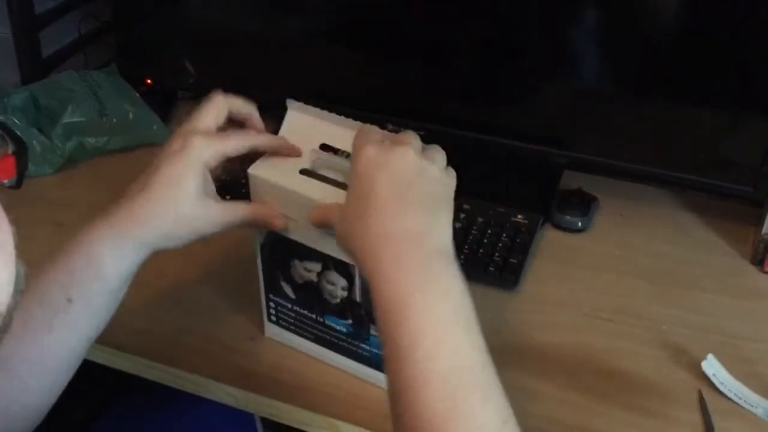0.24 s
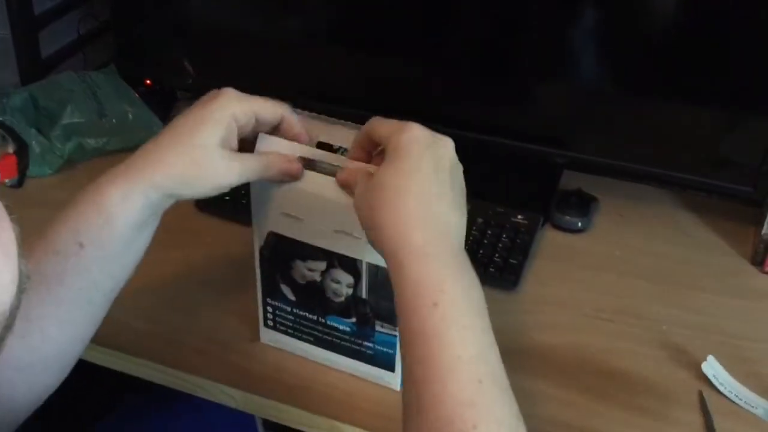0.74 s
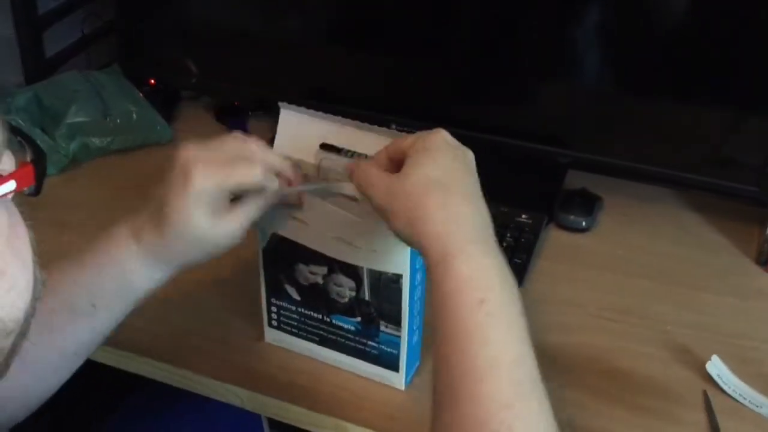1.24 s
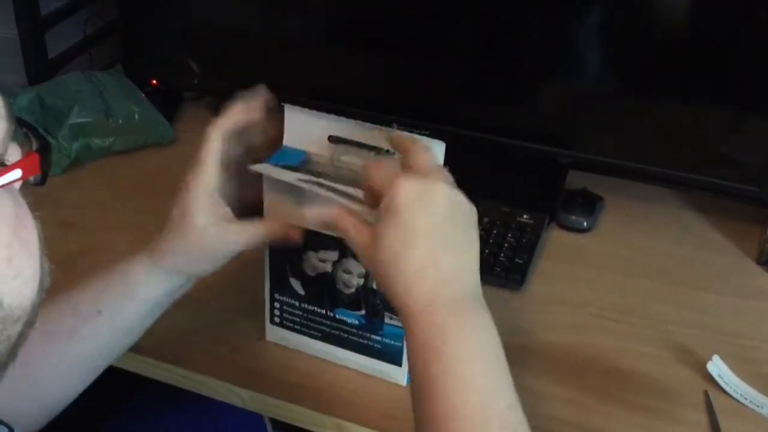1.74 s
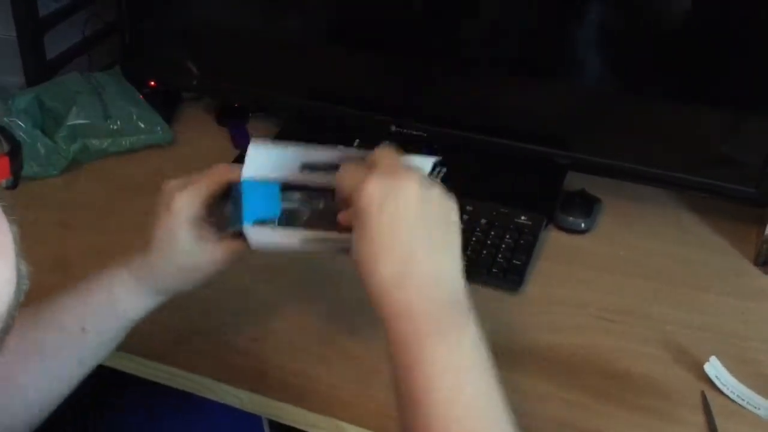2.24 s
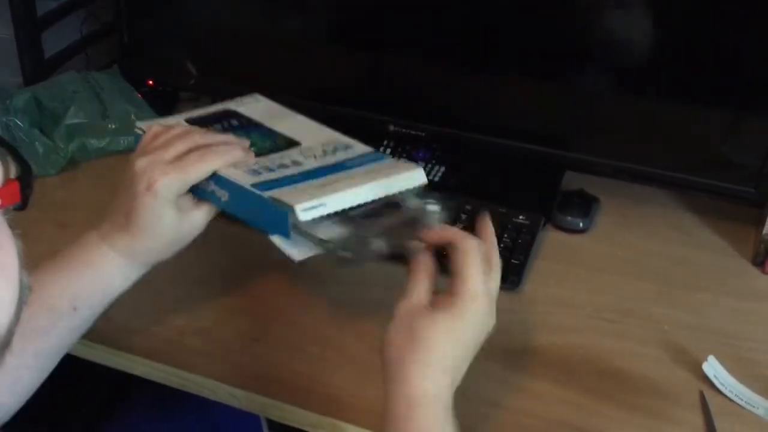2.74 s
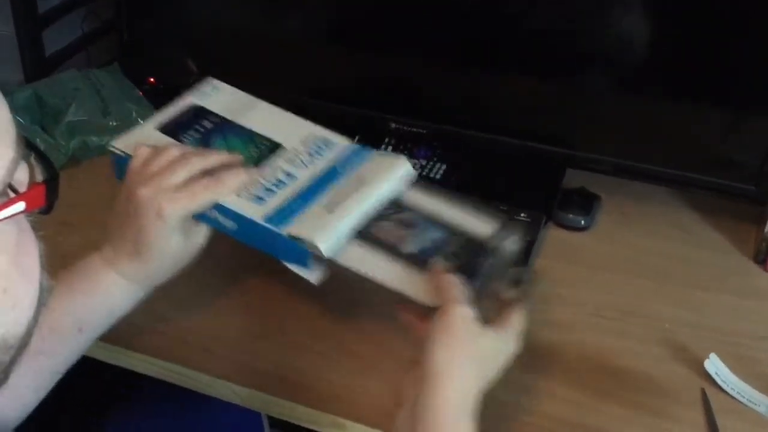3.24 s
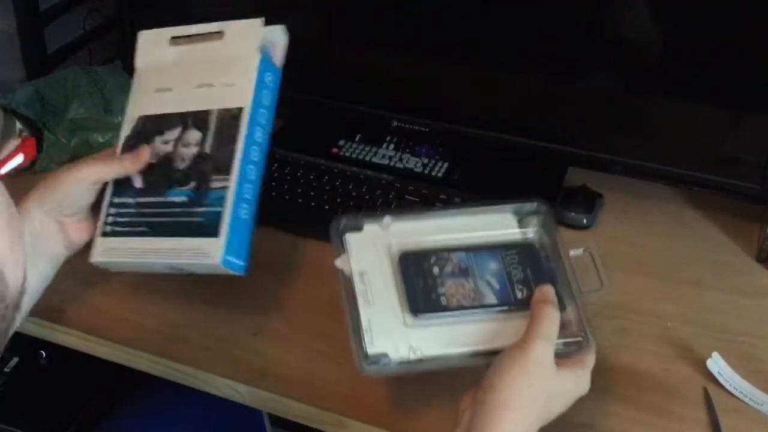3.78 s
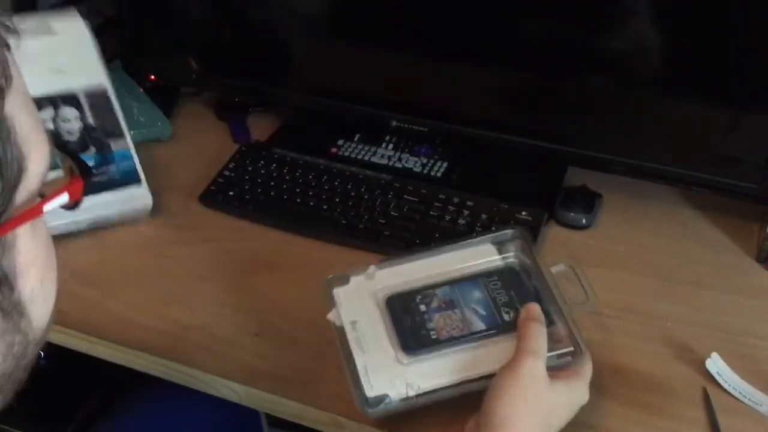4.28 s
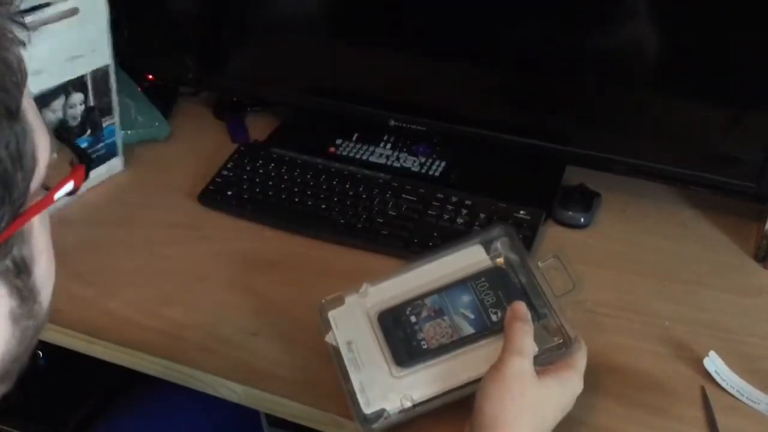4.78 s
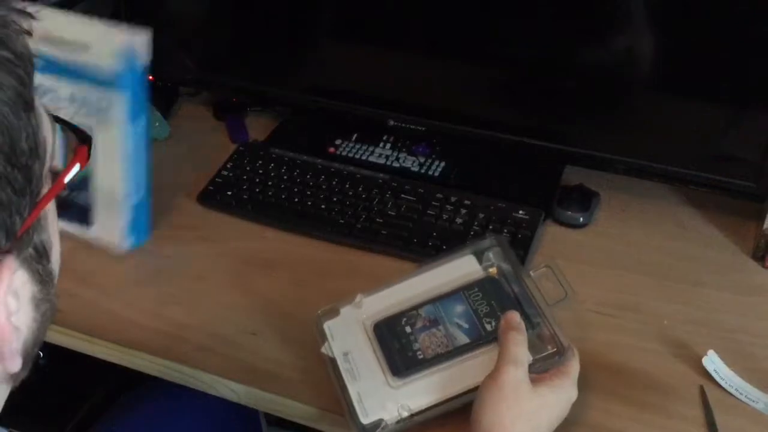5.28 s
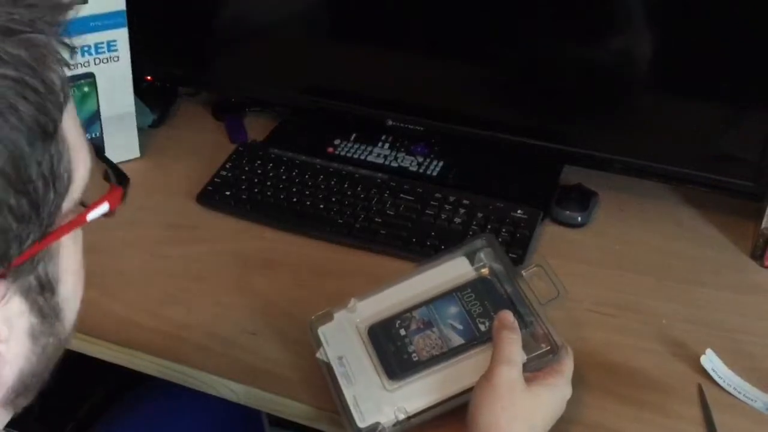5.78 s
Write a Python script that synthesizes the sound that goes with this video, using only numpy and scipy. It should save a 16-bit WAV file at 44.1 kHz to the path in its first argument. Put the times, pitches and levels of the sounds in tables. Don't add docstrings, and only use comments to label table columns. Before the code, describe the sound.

Thin cardboard box flaps snap and rustle under fingers, a tab pops, a plastic tray slides out, then the box knocks hollowly and squeaks on a desk.

```python
import sys
import numpy as np
from scipy import signal
from scipy.fft import rfft, irfft
from scipy.io import wavfile

SR = 44100
rng = np.random.default_rng(int(sys.argv[2]) if len(sys.argv) > 2 else 0)


def wav_out(sig):
    wavfile.write(sys.argv[1], SR, np.round(np.clip(np.atleast_2d(sig).T, -1, 1) * 32767).astype(np.int16))


def linear_from_db(decibels):
    return 10 ** (np.asarray(decibels, float) / 20)


N = 265482

# pitch in Hz, level in dB per Hz.
ROOM_AIR = [(15, -15), (25, 12), (64, -20), (120, -1), (300, -9), (1300, -17), (2990, -33), (16000, -41)]
# pitch in Hz, width in Hz, level in dB.
HUM = [(120.5, 8, -60), (305, 14, -64)]
# pitch in Hz, level in dB, time to fade 60 dB in s.
BOX_PANELS = [(225, -17.5, 0.062), (320, -26.5, 0.1), (342.3, -6.5, 0.042), (420, -12, 0.019),
              (596, -4.5, 0.013), (703, 0.5, 0.011), (903, 1, 0.0098), (1180, 1.5, 0.012),
              (1450, 0, 0.0093), (1563, 6.5, 0.0046), (1904, -2, 0.014), (2190, -12, 0.064),
              (2320, -13.5, 0.0061)]
# start in seconds, peak in dB, strongest panel in Hz, crack in dB relative to the peak,
# slip length in seconds.
CARD_SNAPS = [(0.098, -44, 270, -35, .004), (0.108, -29.5, 1270, -40, 0.0032), (.188, -28, 596, -30, 0.026),
              (0.217, -23, 348, -38, 0.014), (.261, -16.5, 338, -52, 0.0084),
              (0.292, -13.5, 1180, -47, 0.0014), (0.35, -33, 1000, -31, .003),
              (0.363, -19, 395, -43, 0.0012), (0.385, -23, 350, -31, 0.0073),
              (0.482, -29.5, 1130, -14.5, 0.004), (0.502, -24.5, 317, -26, 0.0016),
              (0.547, -26, 315, -32, 0.004), (0.588, -29, 1210, -25, 0.0035), (0.679, -26, 900, -22, 0.004),
              (0.703, -18, 674, -24, 0.0031), (0.7964, -12, 594, -22.5, 0.0043),
              (0.801, -12, 346, -22.5, 0.0054), (0.825, -16.5, 800, -30, 0.0033),
              (0.8619, -13, 980, -20, 0.0079), (0.866, -17, 358, -20, 0.0036),
              (0.945, -18.5, 1015, -32, 0.0048), (1.001, -26, 630, -38, 0.0061),
              (1.021, -22.5, 1180, -44, 0.016), (1.033, -17, 1180, -31, 0.019),
             (1.097, -28, 1180, -35, 0.0053), (1.135, -29.5, 1100, -20, 0.02),
             (1.271, -23.5, 1150, -36, 0.043), (1.306, -12, 1290, -14.5, 0.0071),
             (1.391, -26, 1270, -35, 0.024), (1.447, -41, 368, -27, 0.0032),
             (1.498, -13, 1170, -24.5, 0.0076), (1.51, -25, 1190, -26, 0.0061),
             (1.56, -17.5, 313, -42, 0.013), (1.718, -24.5, 313, -24, 0.0039),
             (1.786, -24, 386, -21.5, 0.0061), (1.854, -27.5, 330, -20, 0.0014),
             (1.892, -27, 1140, -28, 0.0082), (1.922, -18.5, 342, -49, 0.0018),
             (1.9225, -15, 850, -32, 0.00072), (1.97, -13, 1350, -39, 0.0015),
             (1.996, -16, 320, -27, 0.0063), (2, -26, 800, -30, .003), (2.063, -26, 1200, -28, .004),
              (2.244, -24, 1090, -31, 0.0024), (2.312, -24, 1180, -21.5, 0.0083),
              (2.351, -27.5, 1150, -29, .008), (2.399, -23, 1000, -27, 0.006), (2.42, -28, 850, -35, 0.011),
              (2.481, -27, 600, -26, .004), (2.529, -22, 1310, -35, 0.011), (2.8, -23.5, 1240, -35, 0.012),
              (2.818, -27.5, 1150, -35, 0.013), (2.953, -25, 1210, -18.5, 0.0024),
              (2.993, -23.5, 330, -22, 0.0042), (3.013, -26.5, 1440, -35, 0.0053),
              (3.043, -23, 1600, -29, .008), (3.128, -27.5, 1090, -30, 0.0042),
              (3.193, -24, 480, -38, 0.0023), (3.271, -21, 395, -25, 0.016), (3.335, -16, 910, -21, 0.0064),
              (3.344, -15, 700, -28, 0.0061), (3.694, -28.5, 880, -27, 0.002),
              (3.733, -34.5, 746, -28, 0.023), (3.885, -29, 484, -26, 0.0045),
              (4.341, -24, 1000, -28, 0.0063), (4.699, -37, 296, -35, 0.021), (4.78, -36, 710, -40, 0.0084),
              (5.013, -23.5, 607, -21, 0.0025), (5.242, -33.5, 390, -31, 0.0031)]
# start in seconds, hold in seconds, pressure in dB,
# small panels in dB over the pressure, sliding hiss in dB over the pressure.
FINGER_RUBS = [(.105, 0.085, -39, 1.5, -19), (.15, 0.079, -37.5, -0.5, -10.5), (.28, 0.14, -44, 1, -9),
               (.47, .17, -44.5, 0, -6.5), (.66, 0.1, -42, -6, -11.5), (.80, 0.033, -44, 12.5, -1.5),
               (.87, 0.044, -42, 2, -8), (.97, 0.037, -37, -1, -17.5), (1.03, 0.084, -36.5, -12, -12.5),
               (1.14, 0.07, -41.5, 8, -10.5), (1.23, 0.16, -42.5, -0.5, -12.5),
               (1.31, 0.02, -31.5, 3.5, -13.5), (1.39, 0.086, -38.5, 4.5, -13),
               (1.5, 0.026, -39.5, 8.5, -5.5), (1.58, 0.035, -38, -2, -18.5),
               (1.65, 0.038, -43.5, 2.5, -6.5), (1.72, 0.02, -43, -0.5, -9.5),
               (1.79, 0.068, -44.5, 3, -10.5), (1.88, 0.051, -39, 2.5, -8.5),
               (1.96, 0.081, -36, -2.5, -9.5), (2.07, 0.059, -39, 2, -12), (2.2, 0.069, -46, -6, -14)]
# start in seconds, hold in seconds, pressure in dB,
# small panels in dB over the pressure, sliding hiss in dB over the pressure.
TRAY_TUGS = [(2.32, 0.05, -41, 1, -11.5), (2.40, 0.039, -34, -1, -11.5), (2.51, 0.059, -29, 0, -11.5),
             (2.76, 0.069, -35, -2, -8.5), (2.81, 0.074, -38.5, 0, -8), (2.97, 0.035, -39, 2.5, -11),
             (3.03, 0.0063, -37.5, 5, -18), (3.13, 0.0064, -42.5, 2.5, -17), (3.24, 0.029, -33.5, 0, -7.5),
             (3.33, 0.0077, -31.5, -4, -6.5), (3.44, 0.066, -47.5, 1, -17)]
# start in seconds, hold in seconds,
# pressure in dB, small panels in dB over the pressure, sliding hiss in dB over the pressure.
BOX_MOVES = [(3.58, 0.053, -50.5, 4.5, -12.5), (3.70, 0.047, -49, -3, -23), (3.89, 0.066, -59, 6, -3.5),
             (4.24, 0.06, -49.5, 1, -7), (4.29, 0.077, -29, -10, -18), (4.42, 0.14, -42, -7, -6),
             (4.62, 0.038, -45.5, -16, -9), (4.77, 0.049, -49, -9, -8), (4.86, 0.091, -44, -1.5, -3.5),
             (4.96, 0.088, -51, -10, -4.5), (5.15, 0.029, -60.5, -14, 1), (5.25, 0.046, -44.5, -7, -12),
             (5.44, 0.014, -37.5, 2, -23), (5.48, 0.041, -35, 1, -8), (5.62, 0.033, -51, -3, -11),
             (5.72, 0.043, -60, 8.5, -6.5), (5.81, 0.059, -57, 4.5, -8), (5.925, .004, -65, 16.5, -17)]
# start in seconds, hold in seconds, pressure in dB,
# small panels in dB over the pressure, sliding hiss in dB over the pressure.
SKIDS = [
    (5.3, 0.03, -56.5, 4, 15),
    (5.356, 0.059, -40.5, -6.5, 15.7),
    (5.33, 0.016, -54.5, 0, 19.5),
    (5.43, 0.026, -58, 0, 17.6),
]
# time in seconds, pitch in Hz.
GRIP = [
    (0, 1295),
    (2.4, 1180),
    (2.98, 1220),
    (3.05, 1650),
    (3.15, 1350),
    (6.02, 1100),
]
# pitch in Hz, level in dB per Hz.
CARD_HISS = [(1290, 8), (2200, 0.5), (3070, -3.5), (5390, -3), (10600, -12), (11800, -10), (16000, -18.5)]
# pitch in Hz, level in dB per Hz.
BAG_HISS = [(1290, 6.5), (2200, 4), (2370, -0.5), (2780, -0.5), (13100, -7.5), (16000, -6)]
# pitch in Hz, level in dB per Hz.
SWIVEL_HISS = [(1060, -26), (2120, -11), (3320, -2.5), (4530, -6), (5200, -3.5), (10100, -11.5),
               (15100, -12.5), (16000, -2)]
# start in seconds, hold in seconds, level in dB.
SHOVES = [(0.13, 0.098, -48), (0.25, 0.045, -40), (0.36, 0.022, -40), (0.79, 0.12, -43.5),
          (1.005, 0.085, -45), (1.29, 0.016, -41.5), (1.448, 0.019, -40), (1.509, 0.016, -28.5),
          (1.723, 0.044, -41), (1.902, 0.064, -32.5), (2.062, 0.041, -43.5), (2.235, 0.17, -50),
          (2.607, 0.1, -50), (2.986, .02, -43), (3.297, 0.13, -44.5), (3.812, 0.22, -58),
          (4.237, 0.055, -38), (4.446, 0.071, -45), (4.6, 0.11, -57), (4.997, 0.036, -49.5),
          (5.247, 0.12, -44), (5.456, 0.022, -44), (5.69, 0.25, -55.5)]
# start in seconds, pitch in Hz, peak in dB, length in seconds.
CATCHES = [(0.164, 3820, -43, 0.0092), (.194, 3300, -42, .01), (.292, 3220, -49, .004),
           (.5004, 3750, -42, 0.0038), (0.544, 2090, -33, 0.0041), (.56, 5100, -45, .004),
           (0.703, 4040, -43, 0.0048), (.798, 3700, -41, 0.0056), (0.818, 3700, -40, 0.0092),
           (.944, 3700, -39, 0.0064), (.945, 5050, -42, .005), (1.034, 6100, -44, 0.038),
           (1.278, 4300, -44, .012), (1.306, 4300, -25.5, .006), (1.307, 2230, -24.5, .008),
           (1.396, 4200, -42.5, 0.034), (1.717, 4200, -45, .006), (2.08, 5370, -42, 0.017),
           (2.313, 4000, -40, .008), (2.515, 5500, -34, .015), (2.707, 4100, -46, .004),
           (2.976, 5570, -37, 0.0055), (3.32, 3320, -35.5, .012), (4.235, 1910, -30, 0.025),
           (4.247, 2620, -32.5, 0.014), (4.242, 3530, -41, .008), (4.285, 1950, -34, 0.014),
           (4.293, 3280, -41, .01), (4.335, 2620, -34, 0.0066), (4.459, 2750, -40, .008),
           (4.517, 3300, -42, .008), (4.527, 2780, -43, 0.011), (4.518, 1990, -40.5, 0.012),
           (5.304, 3760, -42, .01), (5.315, 3540, -28.5, .008), (5.349, 3450, -22, 0.017),
           (5.362, 6900, -23, 0.0069), (5.378, 5200, -18.5, .012), (5.382, 6000, -23, 0.011),
           (5.404, 7960, -27, .01), (5.416, 4080, -22, 0.0071), (5.469, 3020, -25, .012)]
# start in seconds, peak in dB, pitch in Hz.
TICKS = [(0.2816, -41, 5000), (0.3842, -37.5, 3500), (.481, -42, 4470), (.546, -33.5, 4850),
         (.678, -48, 4000), (1.4473, -41, 4000), (1.4993, -27, 3500), (1.512, -34, 3500),
         (1.9456, -45, 5000), (1.968, -41, 3800), (1.989, -40, 5800), (2.925, -46, 5000),
         (2.9533, -50, 6000), (3.1951, -48, 4540), (3.562, -45, 4040), (3.8874, -56, 3000),
         (3.9214, -52, 3500), (4.328, -39, 2600), (4.339, -38, 4300), (4.4373, -42, 2200),
         (4.4413, -36, 5040), (4.578, -40, 4050), (4.5803, -44, 6200), (4.595, -35, 3500),
         (4.596, -45, 7000), (5.013, -38, 2930), (5.2419, -48, 4750), (5.5374, -38, 4000),
         (5.563, -33.5, 3800), (5.6595, -46, 2630), (5.7086, -45, 2900), (5.7548, -54, 4360),
         (5.815, -48, 2400), (5.835, -41, 2750), (5.856, -45, 2980), (5.867, -45, 3600),
         (5.9257, -40, 2440)]
# start in seconds, blow in dB, contact hardness in Hz.
TAB_POP = [
    (1.4955, -2, 600),
    (1.5003, -8, 2200),
    (1.511, -20, 1200),
]
# pitch in Hz, level in dB, time to fade 60 dB in s.
FRONT_PANEL = [(120, -18, .1), (200, -13, .03), (285, -8, .04), (367, 0, .036), (540, -12, .04),
               (711, -5, .035), (1203, -10, .045), (1540, -20, .04)]
# start in seconds, blow in dB, contact hardness in Hz.
KNOCKS = [(4.229, -9.5, 2160), (4.2338, -10, 1570), (4.242, -8.5, 1610), (4.252, -8, 1210),
          (4.283, -16, 600), (4.30, -13, 595), (4.325, -24, 900), (4.345, -31, 1000), (4.40, -30, 800),
          (4.45, -28.5, 600), (4.575, -30, 396), (4.645, -30, 403)]
# pitch in Hz, level in dB, time to fade 60 dB in s.
DESK = [(213, -10, .08), (228, -24, .25), (255, -14, .06), (301, -9, .16), (360, -13, .1), (403, -5, .07),
        (448, -11, .12), (480, -23, .2), (587, -17, .08), (703, -7, .04), (770, -14, .05), (958, -12, .05),
        (1082, -21, .1), (1200, -15, .04)]
# start in seconds, blow in dB, contact hardness in Hz.
THUDS = [
    (4.2285, -11, 500),
    (4.2372, -8, 500),
    (4.2458, -13, 500),
    (4.44, -32, 400),
    (4.575, -31, 400),
    (4.645, -31, 400),
    (5.243, -31, 400),
]
# pitch in Hz, level in dB, time to fade 60 dB in s.
DESK_FLEX = [(104, -12, .25), (116, -1, .055), (127.5, -11, .33), (163, -10, .2)]

ROOM_AIR_DB, AIR_SWAY_DB = -45.5, 0.8
BIG_FOCUS_DB, SMALL_FOCUS_DB = 10.5, 40.5
SMALL_ABOVE_HZ = 1020
CRACK_RISE_S, CRACK_HZ = .003, 4500
FINGER_SLOPES, TUG_SLOPES, MOVE_SLOPES = (680, 500), (217, 263), (320, 240)
SKID_SLOPES, SHOVE_SLOPES = (1100, 500), (250, 160)
BAG_FROM_S, SWIVEL_FROM_S = 3.53, 5.2
PATCHY_DB = 2.0
CRACKLE_DB, CRACKLES_PER_S = -8, 900
GRIT_DB, GRIT_PER_S = 1.8, 90
DESK_REST_DB = -66
TICK_SPAN, TICK_BROAD_DB = 1.3, -5
CATCH_CYCLES, CATCH_RISE_S = 26, .003
ROOM_T60_S, ROOM_DB, WALL_CUT_HZ = 0.14, -16.5, 4200


def rms_one(x):
    return x / np.sqrt(np.mean(x ** 2) + 1e-20)


def drift(rate):
    r = np.exp(-2 * np.pi * rate / SR)
    warm_up = 9000
    wander = signal.lfilter([1], [1, -2 * r, r * r], rng.standard_normal(N + warm_up))
    return rms_one(wander[warm_up:])


def ring(x, hz, t60):
    r, w = linear_from_db(-60 / (t60 * SR)), 2 * np.pi * hz / SR
    return signal.lfilter([0, np.sin(w)], [1, -2 * r * np.cos(w), r * r], x + 1e-18)


def band(x, low_hz, high_hz, order=2):
    sos = signal.butter(order, [low_hz, min(high_hz, .45 * SR)], "band", fs=SR, output="sos")
    return signal.sosfilt(sos, x)


def colour(x, spectrum):
    hz, level_db = np.transpose(spectrum)
    log_hz = np.log(np.arange(N // 2 + 1) * SR / N + 1)
    gain = linear_from_db(np.interp(log_hz, np.log(hz), level_db))
    return rms_one(irfft(rfft(x) * gain, N))


def grains(per_s, spread_db, clump_db, clump_rate):
    sizes = linear_from_db(spread_db * np.minimum(rng.exponential(1, N), 4)) * rng.choice([-1, 1], N)
    happens = rng.random(N) < per_s / SR
    return sizes * happens * linear_from_db(clump_db * drift(clump_rate))


def add(out, s, sound):
    at = round(s * SR)
    out[at:at + len(sound)] += sound[:N - at]


def swell(start, hold, level_db, slopes):
    s = np.arange(0, N, 32)[:, None] / SR
    rise, fall = slopes
    under_db = rise * np.maximum(start - s, 0) + fall * np.maximum(s - start - hold, 0)
    power = np.sum(linear_from_db(level_db - under_db) ** 2, axis=1)
    return np.interp(np.arange(N) / SR, s[:, 0], power)


def background():
    hum = 0
    for hz, width, db in HUM:
        t60 = np.log(1000) / np.pi / width
        hum = hum + linear_from_db(db) * rms_one(ring(rng.standard_normal(N), hz, t60))
    air = colour(rng.standard_normal(N), ROOM_AIR) * linear_from_db(AIR_SWAY_DB * drift(1.6))
    return linear_from_db(ROOM_AIR_DB - 6.5) * air + hum


def snaps():
    out, t = np.zeros(N), np.arange(6000) / SR
    for s, peak_db, hz, crack_db, slip_s in CARD_SNAPS:
        focus_db = SMALL_FOCUS_DB if hz > SMALL_ABOVE_HZ else BIG_FOCUS_DB
        fade = np.exp(-t / np.clip(slip_s, .0005, .03))
        slips = rng.standard_normal((3, len(t))) * fade
        luck_db = rng.normal(0, 3.2, len(BOX_PANELS))
        body = 0
        for k, (mode_hz, db, t60) in enumerate(BOX_PANELS):
            near_db = db - focus_db * abs(np.log2(mode_hz / hz))
            body = body + linear_from_db(near_db + luck_db[k]) * ring(slips[k % 2], mode_hz, 1.42 * t60)
        body = band(body, 190, min(4.9 * hz, 2600), order=3)
        crack = band(slips[2] * fade ** 0.08 * np.minimum(t / CRACK_RISE_S, 1), 1700, 15200)
        bright_hz = np.clip(CRACK_HZ * linear_from_db(.6 * luck_db[0]), 2500, 10000)
        crack = crack + .8 * band(crack, bright_hz, 1.6 * bright_hz)
        snap = body / abs(body).max() + linear_from_db(crack_db + 8) * crack / abs(crack).max()
        add(out, s, linear_from_db(peak_db - 2.5) * snap)
    return out


def gestures():
    power = np.full((3, N), 1e-12)
    motions = ((FINGER_RUBS, FINGER_SLOPES), (TRAY_TUGS, TUG_SLOPES),
               (BOX_MOVES, MOVE_SLOPES), (SKIDS, SKID_SLOPES))
    for rows, slopes in motions:
        start, hold, press_db, small_db, hiss_db = np.transpose(rows)
        power += [swell(start, hold, press_db + over_db, slopes) for over_db in (0, small_db, hiss_db)]
    return 10 * np.log10(power)


def rubbing(card_db, small_db, grip_hz):
    slips = [grains(2500, spread_db=3.0, clump_db=4.0, clump_rate=60) for _ in range(3)]
    rung = []
    for k, (hz, db, t60) in enumerate(BOX_PANELS):
        damping = 0.45 if k < 6 else 0.9
        rung.append((-1) ** k * ring(slips[k % 3], hz, damping * t60))
    big = sum(linear_from_db(db) * x for (hz, db, t60), x in zip(BOX_PANELS[:6], rung))
    big = band(big, 98, 4400)
    share = np.array([linear_from_db(0.4 * db - 26 * abs(np.log2(hz / grip_hz))) for hz, db, t60 in BOX_PANELS[6:]])
    small = sum(part * rms_one(x) for part, x in zip(share, rung[6:]))
    small = small / np.sqrt(np.sum(share ** 2, axis=0))
    return linear_from_db(card_db - 3.5) * rms_one(big) + linear_from_db(small_db - 6.0) * small


def surface_hiss(hiss_db):
    edges_hz = [1000, 2400, 3300, 4400, 5700, 7300, 9500, 12500, 17000]
    fine = 0
    for low, high in zip(edges_hz, edges_hz[1:]):
        region = band(grains(9000, spread_db=2.5, clump_db=1.3, clump_rate=50), low, high)
        fine = fine + region * linear_from_db(PATCHY_DB * drift(18))
    crackle = rms_one(grains(CRACKLES_PER_S, spread_db=4.0, clump_db=7.0, clump_rate=20))
    fine = rms_one(fine) + linear_from_db(CRACKLE_DB) * crackle
    s = np.arange(N) / SR
    surface = (s > BAG_FROM_S).astype(int) + (s > SWIVEL_FROM_S)
    hiss = np.choose(surface, [colour(fine, c) for c in (CARD_HISS, BAG_HISS, SWIVEL_HISS)])
    return linear_from_db(hiss_db - 0.56 + GRIT_DB * drift(GRIT_PER_S)) * hiss


def rumble(rumble_db):
    shaking = band(rng.standard_normal(N), 6.4, 68) * linear_from_db(2.5 * drift(10))
    return linear_from_db(rumble_db + 1.0) * rms_one(shaking)


def edge_catches():
    out, t = np.zeros(N), np.arange(3000) / SR
    for s, hz, peak_db, length_s in CATCHES:
        scrape = rng.standard_normal(len(t)) * np.exp(-t / length_s) * np.minimum(t / CATCH_RISE_S, 1)
        chirp = ring(scrape, hz, CATCH_CYCLES / hz)
        add(out, s, linear_from_db(peak_db) * chirp / abs(chirp).max())
    return out


def tray_ticks():
    out, t = np.zeros(N), np.arange(3000) / SR
    for s, peak_db, hz in TICKS:
        click = rng.standard_normal(len(t)) * np.exp(-t / 0.001)
        pop = band(click, hz / TICK_SPAN, hz * TICK_SPAN)
        pop = pop + linear_from_db(TICK_BROAD_DB) * band(click, 1700, 8100, order=1)
        add(out, s, linear_from_db(peak_db + 2.5) * pop / abs(pop).max())
    return out


def strike(blows, body):
    out, t = np.zeros(N), np.arange(12000) / SR
    for s, blow_db, hard_hz in blows:
        rattle = rng.standard_normal(len(t)) * np.exp(-t / 0.0083)
        soft = np.exp(-2 * np.pi * hard_hz / SR)
        push = signal.lfilter([(1 - soft) ** 2], [1, -2 * soft, soft ** 2], 0.057 * rattle + (t == 0))
        luck_db = rng.normal(0, 1, len(body))
        modes = 0
        for k, (hz, db, t60) in enumerate(body):
            modes = modes + (-1) ** (k // 2) * linear_from_db(db + luck_db[k]) * ring(push, hz, t60)
        edge = linear_from_db(-17) * hard_hz / 1000 * band(rattle, 790, 2430)
        add(out, s, linear_from_db(blow_db) * (band(modes, 92, 9000) + edge))
    return out


def knocks():
    return strike(TAB_POP, FRONT_PANEL) + strike(KNOCKS, DESK) + strike(THUDS, DESK_FLEX)


def room(x):
    t = np.arange(SR // 2) / SR
    tail = rng.standard_normal(len(t)) * linear_from_db(-60 * t / ROOM_T60_S) * (t > .006)
    tail = band(tail, 140, WALL_CUT_HZ, order=1)
    return linear_from_db(ROOM_DB) * signal.fftconvolve(x, tail / np.sqrt(np.sum(tail ** 2)))[:N]


def scene():
    card_db, small_db, hiss_db = gestures()
    grip_hz = np.interp(np.arange(N) / SR, *np.transpose(GRIP))
    desk_db = 10 * np.log10(swell(*np.transpose(SHOVES), SHOVE_SLOPES) + linear_from_db(DESK_REST_DB) ** 2)
    hits = snaps() + edge_catches() + tray_ticks() + knocks()
    near = hits + rubbing(card_db, small_db, grip_hz) + surface_hiss(hiss_db)
    return (near + room(near) + rumble(desk_db) + background())[None]


def band_limit(x):
    return signal.sosfilt(signal.butter(12, 16480, fs=SR, output="sos"), x)


def record(dry):
    clipped = np.clip(dry, -.96, .96)
    top_cut = signal.cheby2(12, 70, 16750, fs=SR, output="sos")
    mix = signal.sosfilt(top_cut, clipped)
    return band_limit(mix)


dry = scene()
out = record(dry)
wav_out(out)
```